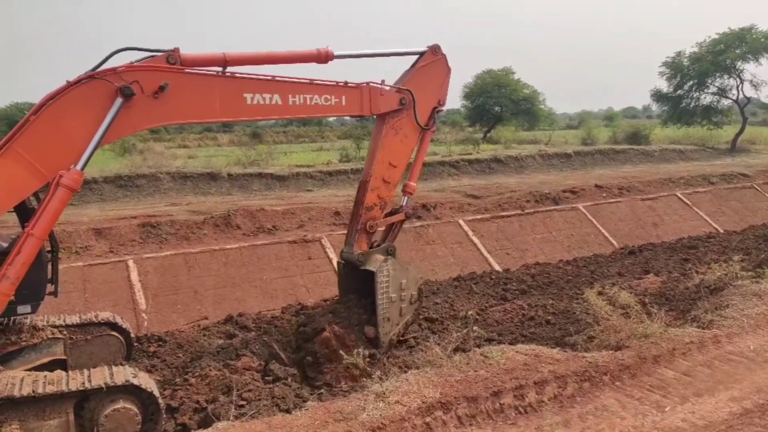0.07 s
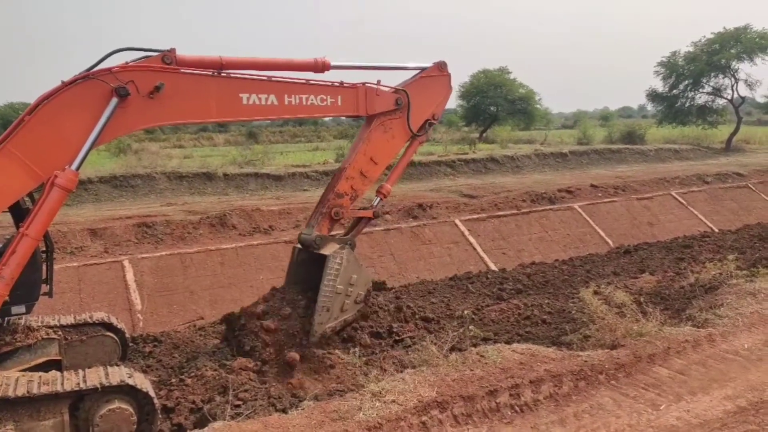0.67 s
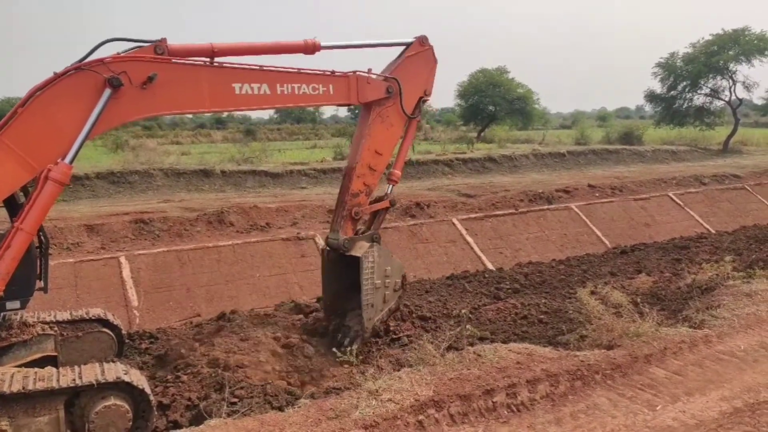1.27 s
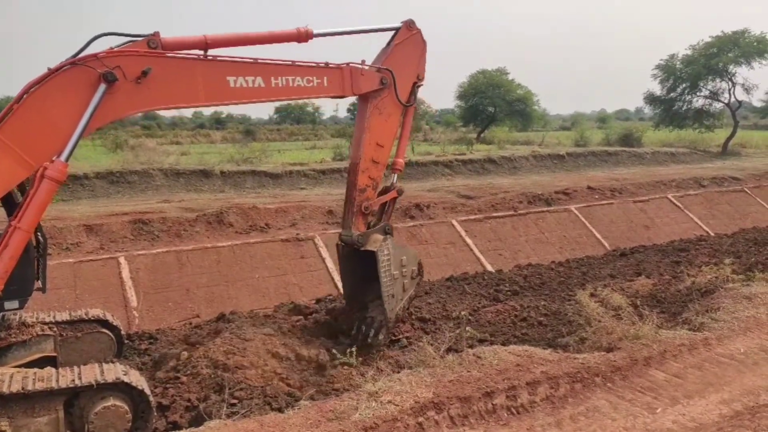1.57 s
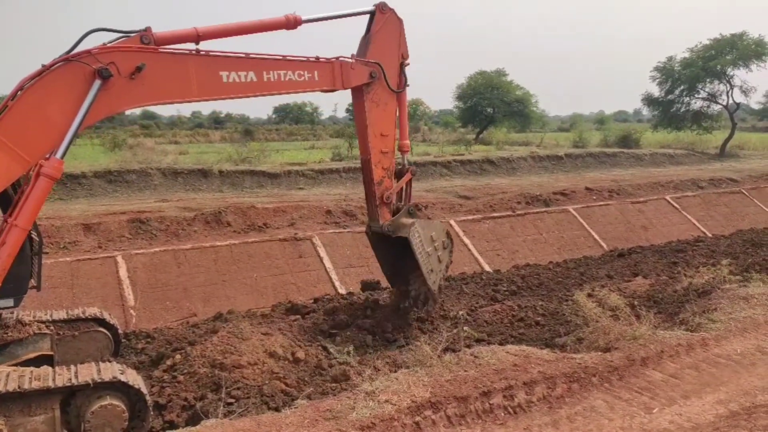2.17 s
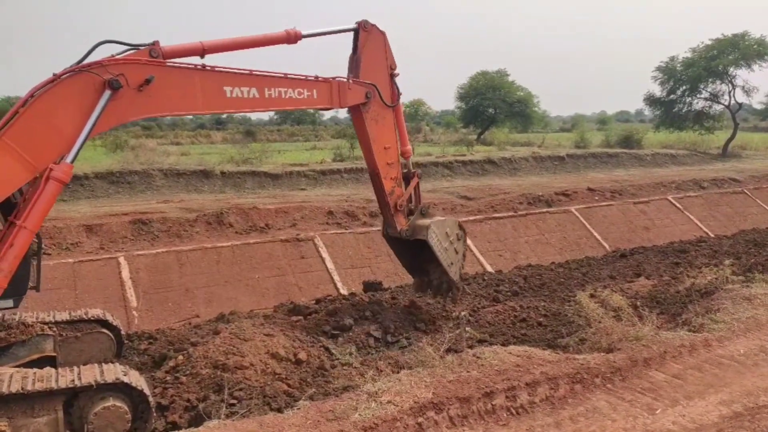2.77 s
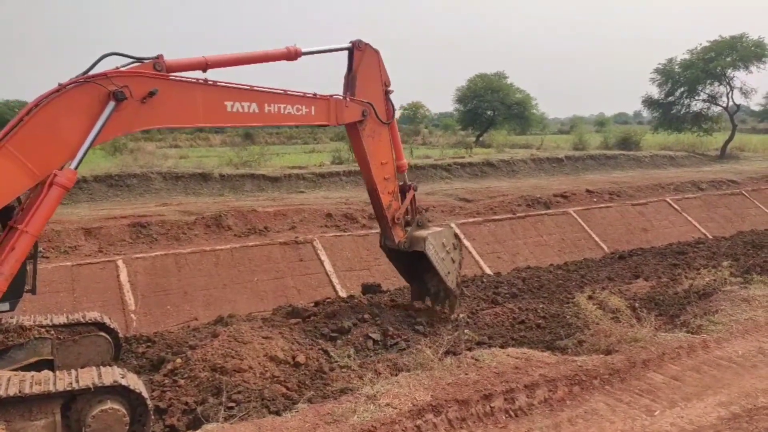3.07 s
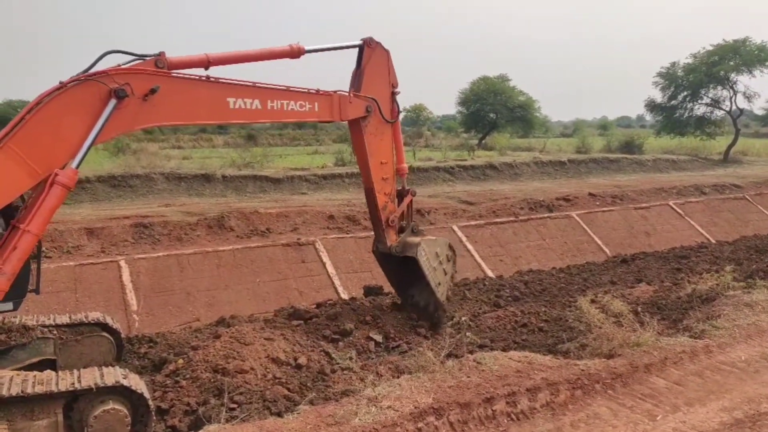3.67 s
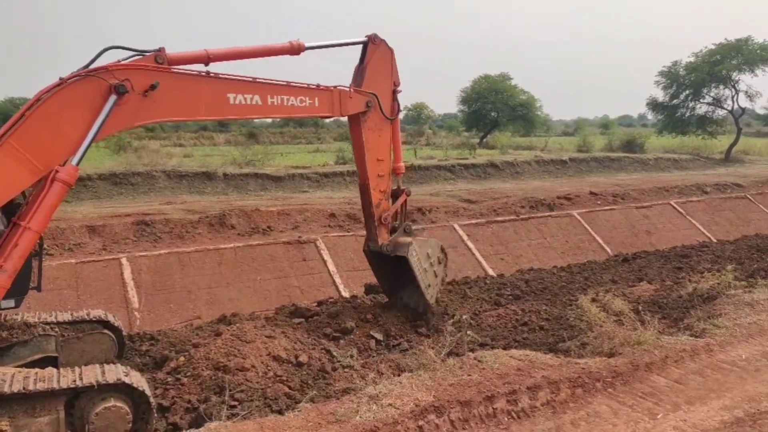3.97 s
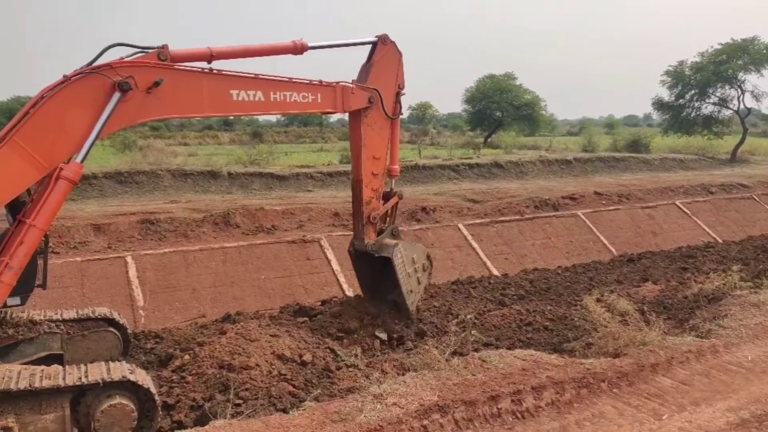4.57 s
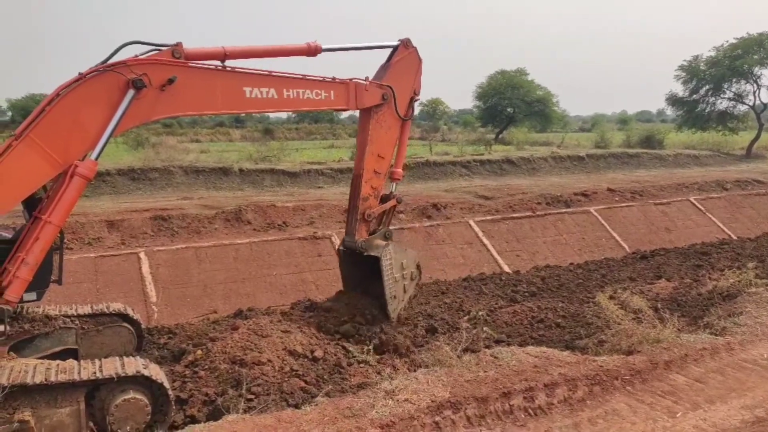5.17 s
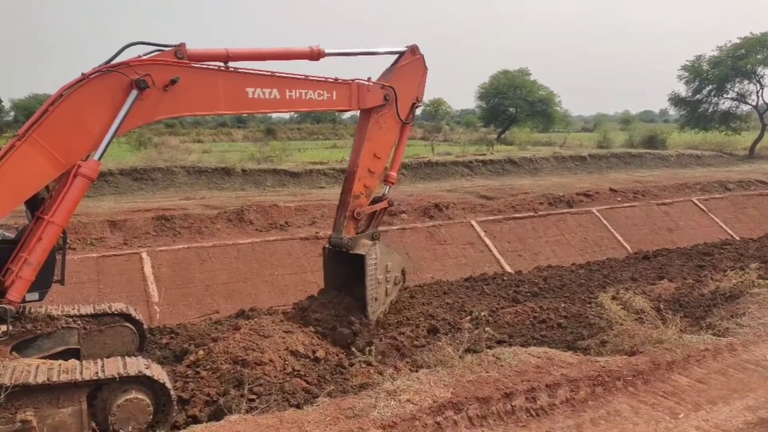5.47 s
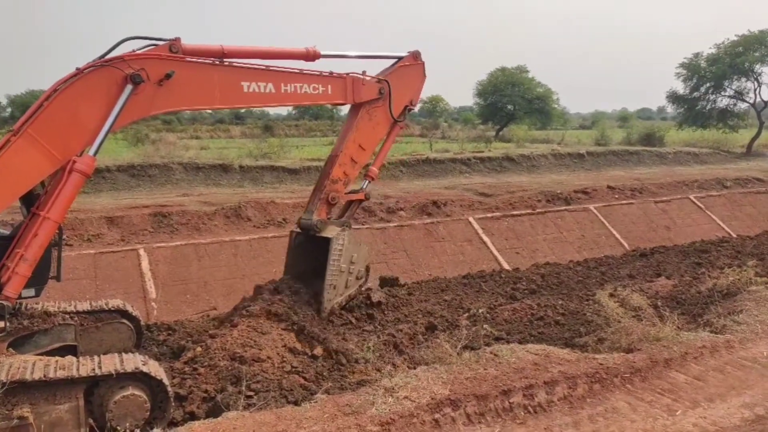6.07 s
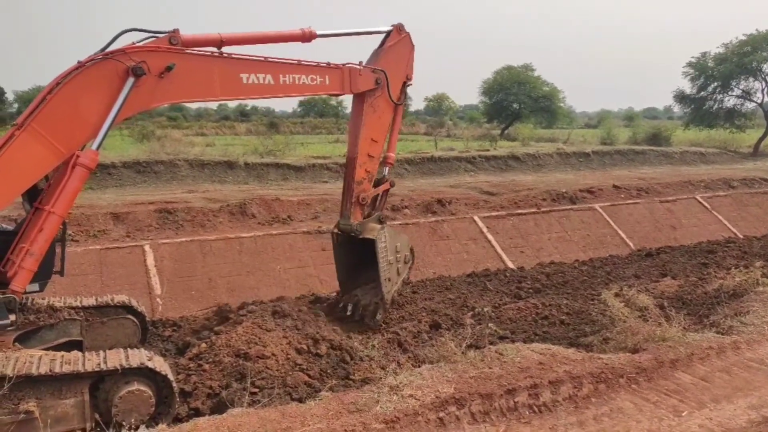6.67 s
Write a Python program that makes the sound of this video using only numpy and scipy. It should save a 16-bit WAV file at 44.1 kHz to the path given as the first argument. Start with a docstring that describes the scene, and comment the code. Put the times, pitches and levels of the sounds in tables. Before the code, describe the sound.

Metal clanks, stone knocks and gritty scrapes from a working excavator bucket come over a steady diesel rumble and hydraulic whine.

```python
"""A diesel drone, a few metres away: an excavator levelling soil in open country.
Exhaust and combustion pulse at the firing rate under changing load; the pump whines, the turbo whistles.
Dry pins squeak. The steel bucket clanks in its worn pins, scrapes through earth and knocks on stones.
Loose links clink and a bucket tooth pings once."""
import sys
import numpy as np
from scipy import signal
from scipy.io import wavfile

SR = 44100
rng = np.random.default_rng(int(sys.argv[2]) if len(sys.argv) > 2 else 0)


def store_pcm(level_fs):
    """Save levels as 16-bit WAV."""
    pcm = np.round(np.clip(level_fs, -1, 1) * 32767).astype(np.int16)
    wavfile.write(sys.argv[1], SR, np.atleast_2d(pcm).T)


N = 300762
TIME = np.arange(N) / SR

# set engine speed (time [s], firing rate [Hz])
FIRING_HZ = [(0.0, 53.1), (1.08, 53.1), (1.29, 54.6), (1.77, 54.5), (1.9, 53.2), (2.53, 53.1), (2.66, 54.5),
             (3.93, 54.5), (4.06, 51.8), (6.15, 51.8), (6.51, 53.6), (6.82, 51.8)]
# engine effort (time [s], level over usual [dB])
EFFORT_DB = [(0, -4.5), (1.1, 1.5), (2.15, 0), (3.3, -3.5), (3.8, 4), (4.9, -1), (5.95, -2.5), (6.55, 6),
             (6.82, 5.5)]
# exhaust tones (multiple of firing rate [ratio], level [dB])
EXHAUST_ORDERS = [(1, -0.5), (2, -14), (2.5, -15), (3, -22), (4, -18.5), (5, -15.5), (6, -19)]
# exhaust rumble, combustion clatter, oil hiss (frequency [Hz], relative density [dB])
RUMBLE_SPECTRUM = [(25, -8), (45, -7), (70, -27), (105, -4.5), (180, -11), (315, -8.5), (400, -21.5),
                   (470, -15), (620, -28)]
CLATTER_SPECTRUM = [(550, -1.5), (690, 10), (860, 1), (960, 3.5), (1150, 1.5), (1500, -12), (1900, 3),
                    (2300, -1), (2800, -6.5), (3200, -29)]
HISS_SPECTRUM = [(3000, 11), (3600, -1), (4250, 5), (5050, 10.5), (5600, -0.5), (6200, 1.5), (7500, 1.5),
                 (10500, 0), (12000, -1), (13200, -7.5), (15400, -1)]
# turbo whistle (time [s], pitch [Hz], level [dB])
TURBO_CURVE = [(0, 8570, -52), (.6, 8510, -55), (1.3, 8550, -58), (4.3, 7720, -70), (4.9, 8080, -58),
               (5.5, 8350, -57), (6.82, 8457, -58)]
# dry pins slipping (time [s], length [s], pitch [Hz], level [dB])
PIN_SQUEAKS = [(0.384, .26, 10750, -44.5), (1.972, .2, 10770, -42.5), (5.3, 0.4, 10960, -52),
               (5.762, 0.11, 10340, -41), (6.195, 0.045, 14250, -17.5), (6.242, 0.018, 12200, -22)]
# bucket blows (time [s], level [dB], extra lows [dB], extra treble [dB])
BUCKET_CLANKS = [(.733, -12.5, -6, -3), (0.773, -4, -10, -13), (.787, 0, -5.5, 0), (0.795, -3.5, -2, 5.5),
                 (.828, -5, -0.5, -1), (.863, -3, -1.5, -7), (.941, -1, -10, -7), (.984, -10.5, 1, -17),
                 (1.027, -2.5, -30, -3.5), (1.056, 2.5, -10, -3), (1.106, -1.5, -26, -12),
                 (1.178, -11.5, -4, -12), (1.199, -19, -11, -13), (1.292, -5, -3, -3),
                 (1.363, -12.5, -12, -3), (1.399, -12, -3.5, -17), (1.529, -16, -2, -21),
                 (1.568, -10, -3, -14), (3.218, -9, -10, 0), (3.283, -2.5, -9.5, 3.5),
                 (3.341, -10.5, -14, 6.5), (3.484, -15.5, -3, -3), (3.580, -10, -5, -0.5),
                 (3.754, -17, -6, -8), (3.874, -9.5, -4.5, -12), (3.965, -19, -11, -7),
                 (4.024, -16.5, -14, -22), (4.156, -2, -4.5, -3.5), (5.395, -23, 3.5, -21),
                 (6.101, -13, -6, -8), (6.149, 5, -4, -5), (6.177, -4.5, -13, 7.5), (6.214, -14.5, 6, 16),
                 (6.249, -16, 3, 5), (6.281, -10.5, 1.5, -31), (6.447, -15, -4, -33), (6.657, -11, -2, -6)]
# strong bucket modes (frequency [Hz], level [dB], t60 [s])
BUCKET_MODES = [(154, -13, .35), (274, -12, .35), (510, -13, .25), (613, -12, .25), (717, -12, .2),
                (822, -12, .22), (947, -17, .22), (1175, -14, .15), (1391, -13, .15), (1464, -13, .2),
                (1730, -17, .16), (2335, -10, .16), (2372, -11, .2), (2940, -17, .15), (3400, -13, .11),
                (3958, -13, .18), (4250, -13, .08), (4554, -10, .15), (4635, -12, .17), (4950, -12, .08),
                (9510, -23, .16), (10000, -27, .16)]
# dense plate modes (frequency [Hz], relative density [dB])
PLATE_SPECTRUM = [(60, 15), (140, 4), (280, 9.5), (390, -7), (540, 6.5), (740, 9), (950, -9.5),
                  (1350, -3.5), (1950, -11), (2900, -12), (4700, -7.5), (6300, -15.5), (10000, -16),
                  (15000, -32)]
# plate decay (frequency [Hz], base t60 [s])
PLATE_T60_S = [(100, 0.2), (700, 0.33), (2500, 0.24), (6000, 0.14), (14000, 0.12)]
# strokes through earth (time [s], length [s], level [dB])
STROKES = [(0.802, 0.28, -22), (1.349, 0.2, -31), (3.189, .15, -23), (3.583, 0.43, -44), (6.167, .15, -22),
           (6.579, .2, -28.5)]
# stones on the bucket (time [s], level [dB], nominal pitch [Hz])
STONE_KNOCKS = [(0.984, -16, 615), (1.787, -31, 1200), (3.256, -20, 900), (3.300, -17.5, 1210),
                (3.791, -24, 1050), (3.842, -13.5, 850), (4.16, -14.5, 1200), (5.279, -28, 1115),
                (5.395, -21.5, 570), (6.180, -12, 800), (6.28, -13, 290.2), (6.450, -28, 1580)]
# loose link blows (time [s], level [dB])
LINK_CLINKS = [(3.229, -32), (3.283, -21), (3.341, -20), (3.487, -31.5), (3.583, -27), (6.704, -31.5),
               (6.764, -29)]
# link modes (frequency [Hz], level [dB], t60 [s])
LINK_MODES = [(2436, 4.5, 0.069), (3380, 1.5, 0.14), (4320, -3, 0.25), (5690, 3, 0.086), (7600, -12, 0.087),
              (9660, -23, 0.25), (10500, -8, 0.31), (9900, -5, 0.12)]
# stereo images (frequency [Hz], left-right correlation [ratio], left over right [dB])
ENGINE_STEREO = [(60, 0.7, -3), (350, 0.99, 2.5), (644, 0.093, -4), (940, 0.43, 7.5), (1220, 1, -1),
                 (1780, 0.25, 7.5), (2530, 0.21, 2), (3430, 1, -3), (5300, 0.24, 8), (7000, 0.36, 1.5),
                 (8450, 0.2, 0.5), (14000, 0.19, 2)]
BUCKET_STEREO = [(100, 0.98, 1.5), (704, 0.96, 1), (1340, 0.33, 2), (2350, 0.8, 3.5), (3570, 0.53, -2),
                 (4700, 0.32, 7.5), (7200, 0.067, 0.5), (14000, 0.067, 5.5)]

USUAL_FIRING_HZ, HUNT_HZ = 51.35, 0.498
EXHAUST_LAG_S, HOUSING_LAG_S = .00024, .00055
CUTOFF_HZ = 15500


def from_db(db):
    """Decibels to gain."""
    return 10 ** (np.asarray(db) / 20)


def unit_rms(x):
    """Scale to unit power."""
    return x / np.sqrt(np.mean(x ** 2) + 1e-20)


def in_time(rows):
    """Each column of a curve at every sample."""
    times_s, *columns = np.transpose(rows)
    return [np.interp(TIME, times_s, column) for column in columns]


def at_hz(points, hz, column=1):
    """Interpolate a column over log frequency."""
    table = np.array(points)
    return np.interp(np.log(hz), np.log(table[:, 0]), table[:, column])


def drift(rate_hz):
    """Smooth random wander, unit RMS."""
    step, settle = 40, 2000
    pole = np.exp(-2 * np.pi * rate_hz * step / SR)
    white = rng.standard_normal(N // step + settle + 2)
    slow = signal.lfilter([1], [1, -2 * pole, pole * pole], white)[settle:]
    return np.interp(np.arange(N) / step, np.arange(len(slow)), unit_rms(slow))


def cycle(hz):
    """Running phase [rad] of a moving frequency."""
    return 2 * np.pi * np.cumsum(hz) / SR


def butter(x, order, hz, kind):
    """Butterworth filter."""
    return signal.sosfilt(signal.butter(order, hz, kind, fs=SR, output="sos"), x)


def clicks(times_s, sizes):
    """One impulse per event."""
    out = np.full(N, 1e-18)
    np.add.at(out, np.clip(np.asarray(times_s) * SR, 0, N - 1).astype(int), sizes)
    return out


def pan(db):
    """Gain pair, left over right by db."""
    return from_db(np.array([[db], [-db]]) / 2)


def from_right(pair, lag_s):
    """Sound from the right arrives later on the left."""
    return np.array([np.roll(pair[0], int(lag_s * SR)), pair[1]])


def bands(spectrum, image, per_octave, grain_db=0):
    """Yield (centre [Hz], stereo noise); unit total power before panning."""
    low_hz, high_hz = spectrum[0][0], min(spectrum[-1][0], CUTOFF_HZ)
    edges_hz = np.geomspace(low_hz, high_hz, int(per_octave * np.log2(high_hz / low_hz)) + 2)
    centres_hz = np.sqrt(edges_hz[1:] * edges_hz[:-1])
    gains = from_db(at_hz(spectrum, centres_hz)) * np.sqrt(np.diff(edges_hz))
    white = rng.standard_normal((2, 2, N)) * from_db(grain_db * np.clip(drift(145), -2, 2))
    for k, hz in enumerate(centres_hz):
        mid, side = unit_rms(butter(white[k % 2], 2, edges_hz[k:k + 2], "band"))
        alike = at_hz(image, hz)
        pair = np.sqrt((1 + alike) / 2) * mid + np.sqrt((1 - alike) / 2) * side * [[1], [-1]]
        yield hz, pair * pan(at_hz(image, hz, column=2)) * gains[k] / np.linalg.norm(gains)


def strike(modes, times_s, level_db, scatter_db, rise_s):
    """Each blow rings every mode at a random strength and phase; the sides differ."""
    hz, mode_db, t60_s = np.transpose(modes)
    age_s = TIME[:int(min(t60_s.max(), 1) * SR)]
    waves = np.exp(np.outer(2j * np.pi * hz - np.log(1000) / t60_s, age_s))
    waves *= 1 - np.exp(-age_s / rise_s)
    shape = (len(times_s), len(hz))
    blow_db = np.transpose([level_db(f) for f in hz])
    sizes = from_db(blow_db + mode_db + scatter_db * rng.standard_normal(shape))
    phases = rng.uniform(0, 2 * np.pi, shape)
    apart_rad = np.arccos(at_hz(BUCKET_STEREO, hz)) * rng.standard_normal(shape)
    left_db = at_hz(BUCKET_STEREO, hz, column=2)
    out = np.zeros((2, N))
    for side, sign in zip(out, (1, -1)):
        gains = sizes * np.exp(1j * (phases + sign * apart_rad / 2)) * from_db(sign * left_db / 2)
        for s, sound in zip(times_s, (gains @ waves).real):
            start = int(s * SR)
            side[start:start + len(age_s)] += sound[:N - start]
    return out


def engine_noise(spectrum):
    """Steady noise in the engine's stereo image."""
    return sum(noise for hz, noise in bands(spectrum, ENGINE_STEREO, per_octave=4))


def loaded_db(usual_db, slope):
    """Layer level, moving by slope dB per dB of effort."""
    return usual_db + slope * in_time(EFFORT_DB)[0]


def overspeed_hz():
    """Set firing rate above the usual."""
    return in_time(FIRING_HZ)[0] - USUAL_FIRING_HZ


def exhaust(firing_rad, fade_db_per_hz=0.3):
    """Low tones locked to the firing rate; a rumble puffs at each firing."""
    tone_db = loaded_db(-19, slope=-0.22) - fade_db_per_hz * overspeed_hz()
    tones = 0
    for multiple, db in EXHAUST_ORDERS:
        unsteady_db = 0.94 * (multiple - 1) * drift(3.9)
        tone = np.sin(multiple * firing_rad + rng.uniform(0, 2 * np.pi))
        tones += from_db(tone_db + db + unsteady_db) * tone
    rumble_db = loaded_db(-29.5, slope=0.85) + 3 * np.cos(firing_rad)
    return tones * pan(1.5) + from_db(rumble_db) * engine_noise(RUMBLE_SPECTRUM)


def engine_housing(firing_rad):
    """Combustion clatters at each firing; oil hisses in the valves."""
    clatter_db = loaded_db(-31, slope=.1) + np.cos(firing_rad) + 0.8 * np.cos(2 * firing_rad)
    clatter = from_db(clatter_db) * engine_noise(CLATTER_SPECTRUM)
    hiss_db = loaded_db(-40.5, slope=-0.091) + drift(43)
    return clatter + from_db(hiss_db) * engine_noise(HISS_SPECTRUM)


def pump(firing_rad, strain_s=0.59, half_width_s=.26, strain_db=13.4, fade_db_per_hz=0.7):
    """Engine-driven hydraulics: a rough whine, and a piston tone that swells once as the arm pushes out."""
    piston_db = -43 + strain_db * np.exp(-((TIME - strain_s) / half_width_s) ** 2)
    piston = from_db(piston_db + 1.2 * drift(10)) * np.sin(9 * firing_rad)
    # held by a housing resonance, the whine follows speed only in part
    whine_rad = cycle(np.full(N, 480.0)) + 5.3 * firing_rad
    whine = (1 + .5 * drift(69)) * np.sin(whine_rad) + .5 * drift(45) * np.cos(whine_rad)
    whine_db = -34 - fade_db_per_hz * np.maximum(overspeed_hz(), 0)
    return piston + from_db(whine_db) * whine


def turbo(flutter_db=3.7, jitter_hz=45):
    """Faint turbo whistle; sags, then climbs back."""
    hz, db = in_time(TURBO_CURVE)
    return from_db(db + flutter_db * drift(9.1)) * np.sin(cycle(hz + jitter_hz * drift(150.74)))


def faint_squeaks(count=20, length_s=.07, hz=10702, spread_hz=259, db=-42.5):
    """Squeak rows, loosely spaced throughout."""
    times_s = (np.arange(count) + rng.random(count)) / count * TIME[-1]
    pitches_hz = hz + spread_hz * rng.standard_normal(count)
    return [(s, length_s, pitch_hz, db) for s, pitch_hz in zip(times_s, pitches_hz)]


def pin_squeaks(glide_hz=100, glide_spread_hz=230):
    """Steel slips on steel in short glides; harder slips rasp wider."""
    out = np.zeros((2, N))
    for s, length_s, hz, db in PIN_SQUEAKS + faint_squeaks():
        size, start = int(length_s * SR), int(s * SR)
        width_hz = np.interp(db, [-44, -25], [90, 400])
        rasp = butter(rng.standard_normal((2, 2, SR))[..., :size], 2, width_hz, "low")
        slide_hz = glide_hz + glide_spread_hz * rng.standard_normal()
        phase = cycle(hz + slide_hz * np.linspace(-.5, .5, size))
        voice = unit_rms(rasp[0] * np.sin(phase) + rasp[1] * np.cos(phase))
        squeak = from_db(db) * signal.windows.tukey(size, .5) * voice
        out[:, start:start + size] += squeak[:, :N - start]
    return out


def plate_crash(times_s, level_db, crash_db=-4.5, stretch=1.29, graze_s=0.014):
    """Dense plate modes as rattling noise; lows build later and outlast the treble."""
    rattle = from_db(1.2 * drift(78))
    lead, age_s = int(graze_s * SR), TIME[:SR // 2]
    out = np.zeros((2, N))
    for hz, noise in bands(PLATE_SPECTRUM, BUCKET_STEREO, per_octave=3):
        rise_s = 0.018 * (3000 / hz) ** 0.27
        t60_s = stretch * at_hz(PLATE_T60_S, hz)
        shape = np.exp(-2 * np.log(1000) * age_s / t60_s) * (1 - np.exp(-age_s / rise_s))
        energy = np.zeros(N)
        for s, gain in zip(times_s, from_db(level_db(hz) + crash_db)):
            start = int(s * SR)
            energy[start:start + len(age_s)] += gain ** 2 * shape[:N - start]
        graze = from_db(-1.5) ** 2 * np.pad(energy[lead:], (0, lead))  # steel slides before it seats
        out += noise * rattle * np.sqrt(energy + graze)
    return out


def bucket(weak_count=150):
    """Clanks in worn pins: strong modes, weak modes between them, and a plate crash."""
    times_s, blow_db, lows_db, treble_db = np.transpose(BUCKET_CLANKS + bucket_taps())

    def level_db(hz):
        """Heavy blows add lows, hard ones treble."""
        lows = at_hz([(750, 1), (1400, 0)], hz)
        treble = at_hz([(3500, 0), (8000, 1)], hz)
        return blow_db + lows * lows_db + treble * treble_db

    ring_db = -5.5 - 0.025 * blow_db  # light blows ring relatively more
    strong = strike(BUCKET_MODES, times_s, lambda hz: level_db(hz) + ring_db,
                    scatter_db=3, rise_s=0.00054)
    weak_hz = np.geomspace(900, 11000, weak_count) * np.exp(.006 * rng.standard_normal(weak_count))
    weak_modes = [(hz, at_hz(PLATE_SPECTRUM, hz) + 6 * np.log10(hz / 1000), .8 * at_hz(PLATE_T60_S, hz))
                  for hz in weak_hz]
    weak = strike(weak_modes, times_s, lambda hz: level_db(hz) - 22, scatter_db=4.5, rise_s=.004)
    return strong + weak + plate_crash(times_s, level_db)


def scrape(trickle_db=-55, attack_s=.025, t60_s=0.52):
    """Grit rubs the plates in clumps on each stroke; loose earth trickles throughout."""
    level = from_db(trickle_db)
    for s, length_s, db in STROKES:
        attack = np.clip((TIME - s) / attack_s, 0, 1)
        release = np.exp(-np.log(1000) * np.maximum(TIME - s - length_s, 0) / t60_s)
        level = level + from_db(db) * attack * release
    clumps = from_db(2 * drift(48))
    grit = sum(noise for hz, noise in bands(PLATE_SPECTRUM, BUCKET_STEREO, per_octave=2, grain_db=2.5))
    return level * clumps * grit


def bucket_taps(per_stroke=2, over_stroke_db=10.9, lows_db=1, treble_db=-26):
    """Clank rows: the bucket taps in its pins at random while earth drags."""
    places = (np.arange(per_stroke) + rng.random((len(STROKES), per_stroke))) / per_stroke
    return [(min(s + length_s * place, TIME[-1]), db + over_stroke_db, lows_db, treble_db)
            for (s, length_s, db), row in zip(STROKES, places) for place in row]


def knock(times_s, db, hz, rise_s=0.00074, t60_s=0.2):
    """Narrow noise just below hz; each blow's energy builds, adds and decays."""
    body = unit_rms(butter(rng.standard_normal(N), 1, [hz / 1.186, hz * 0.98], "band"))
    decay_pole = np.exp(-2 * np.log(1000) / (t60_s * SR))
    rise_pole = np.exp(-1 / (rise_s * SR))
    energy = signal.lfilter([1], [1, -decay_pole], clicks(times_s, from_db(db) ** 2))
    return body * np.sqrt(signal.lfilter([1 - rise_pole], [1, -rise_pole], energy))


def stones(thud_hz=165, equal_db=-13, thud_slope=1.44):
    """Dull knocks on the bucket; heavier stones thud more."""
    times_s, knock_db, _ = np.transpose(STONE_KNOCKS)
    thuds = knock(times_s, equal_db + thud_slope * (knock_db - equal_db), thud_hz)
    return thuds + sum(knock([s], [db], hz) for s, db, hz in STONE_KNOCKS)


def link():
    """A small, loose steel link clinks."""
    times_s, db = np.transpose(LINK_CLINKS)
    return strike(LINK_MODES, times_s, lambda hz: db, scatter_db=1.5, rise_s=0.00066)


def tooth(time_s=3.284, hz=5950, db=-28, t60_s=1.4):
    """A loose bucket tooth pings: one high, long mode."""
    age_s = np.maximum(TIME - time_s, 0)
    return from_db(db - 60 * age_s / t60_s) * np.sin(2 * np.pi * hz * age_s)


def scene():
    """The machine and its work, in open air."""
    firing_rad = cycle(in_time(FIRING_HZ)[0] + HUNT_HZ * drift(4.96))  # the governor hunts
    drone = from_right(exhaust(firing_rad) + pump(firing_rad) + turbo(), EXHAUST_LAG_S)
    housing = from_right(engine_housing(firing_rad), HOUSING_LAG_S)
    return drone + housing + bucket() + link() + tooth() + stones() + scrape() + pin_squeaks()


def record(dry):
    """The loudest clanks clip; a steep low-pass cuts the top."""
    lowpass = signal.ellip(12, .1, 70, CUTOFF_HZ, fs=SR, output="sos")
    return signal.sosfilt(lowpass, np.clip(dry, -1, 1))


dry = scene()
out = record(dry)
store_pcm(out)
```